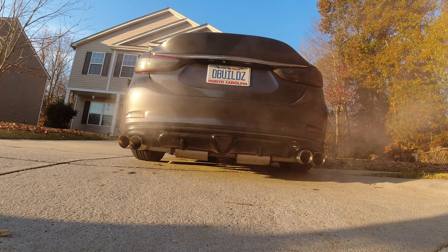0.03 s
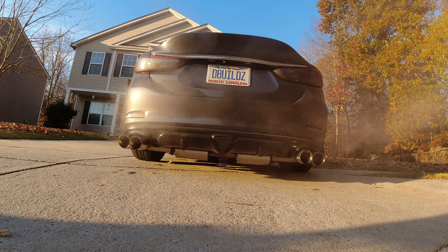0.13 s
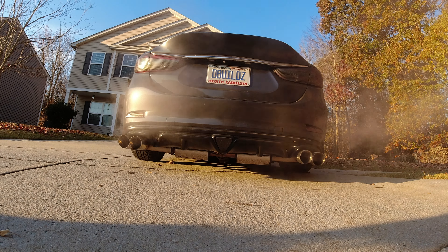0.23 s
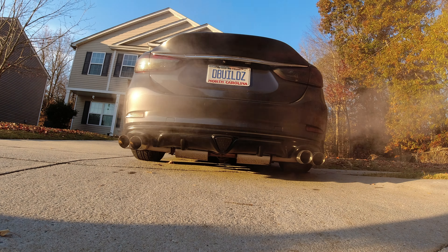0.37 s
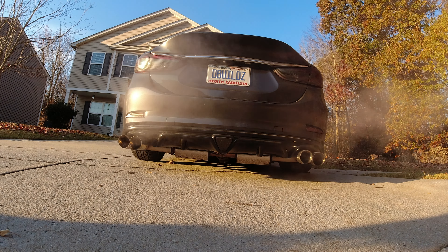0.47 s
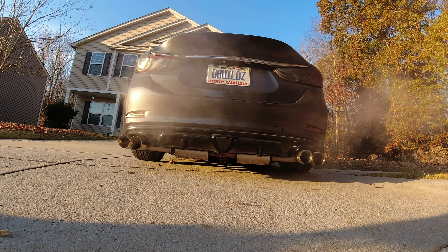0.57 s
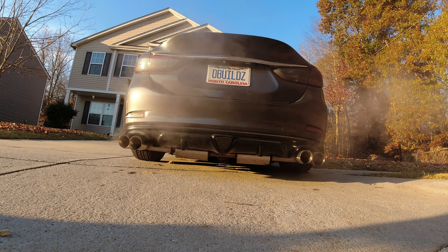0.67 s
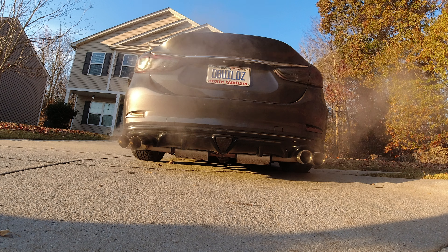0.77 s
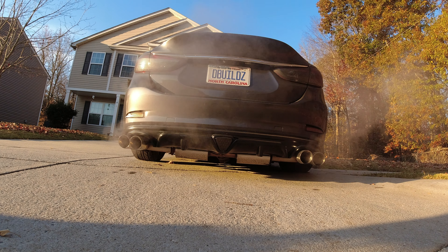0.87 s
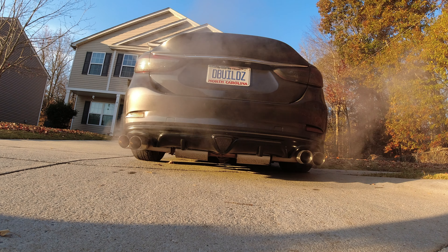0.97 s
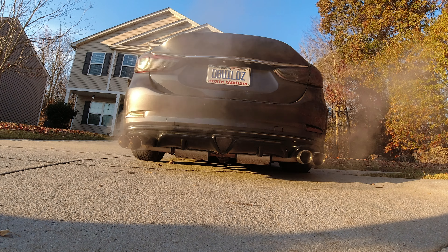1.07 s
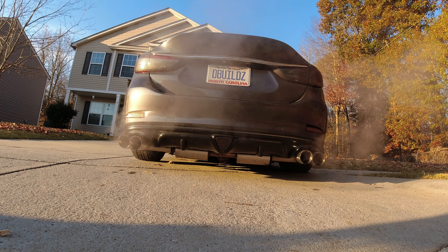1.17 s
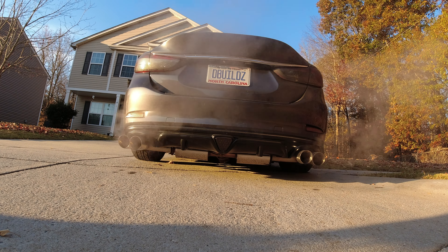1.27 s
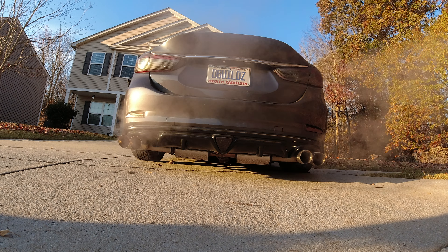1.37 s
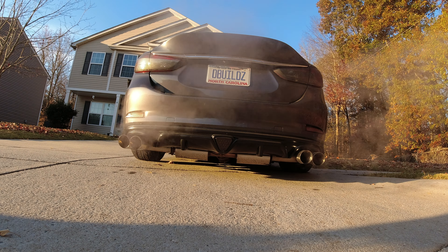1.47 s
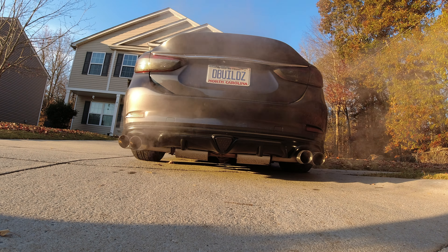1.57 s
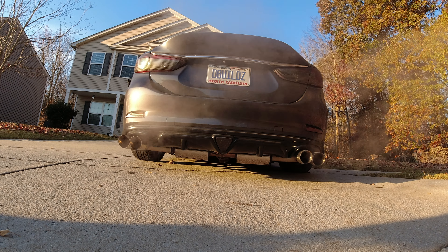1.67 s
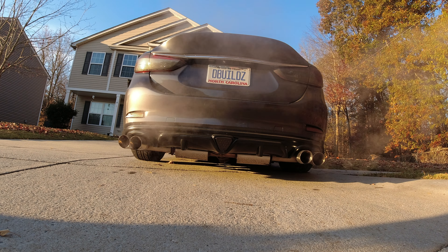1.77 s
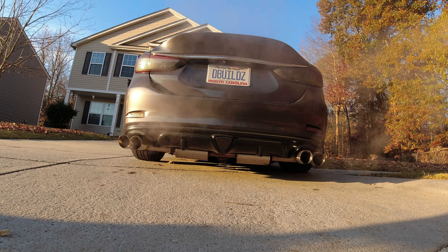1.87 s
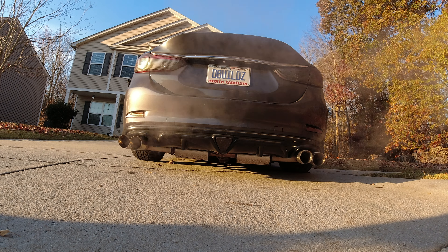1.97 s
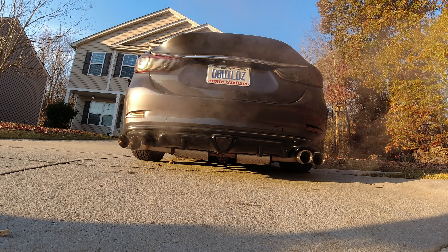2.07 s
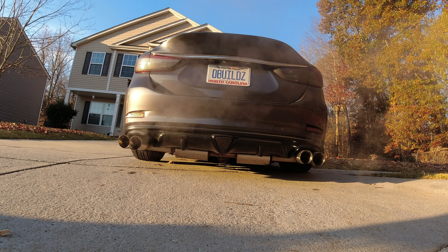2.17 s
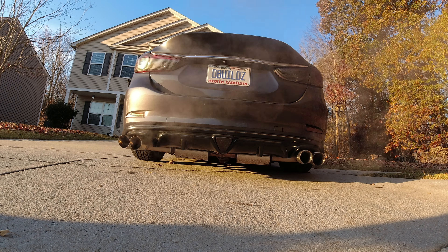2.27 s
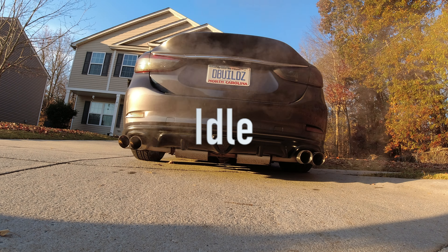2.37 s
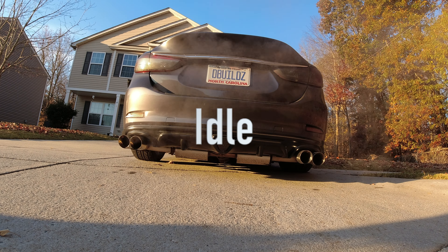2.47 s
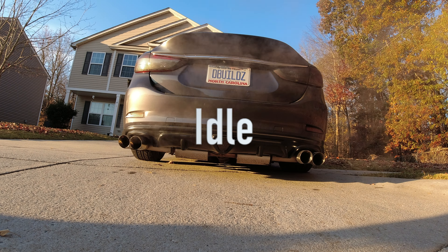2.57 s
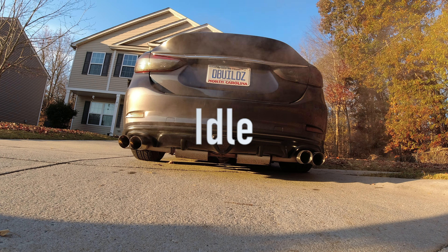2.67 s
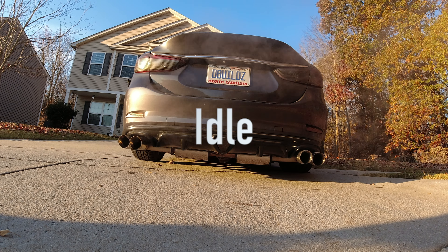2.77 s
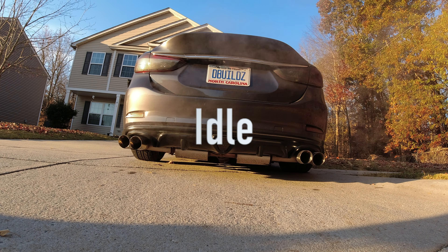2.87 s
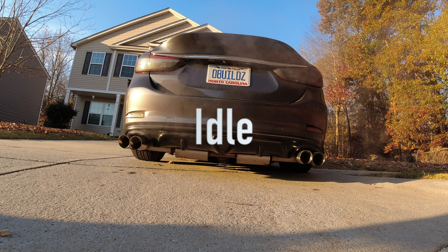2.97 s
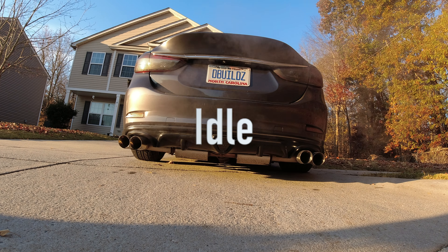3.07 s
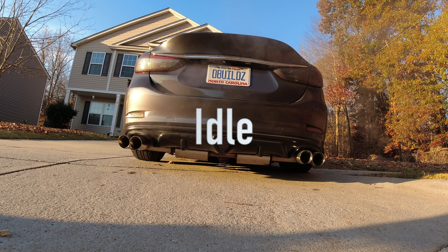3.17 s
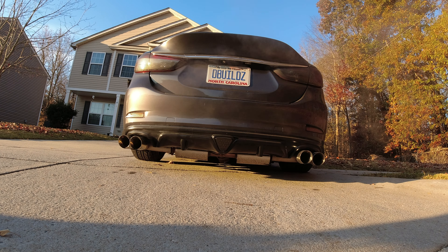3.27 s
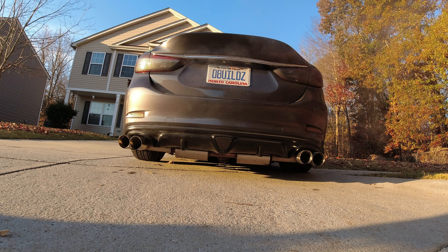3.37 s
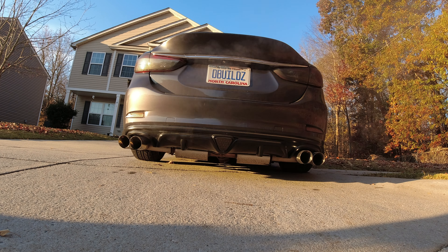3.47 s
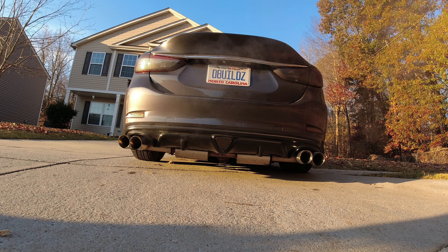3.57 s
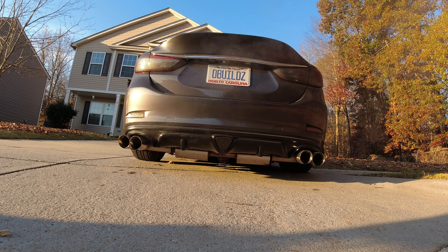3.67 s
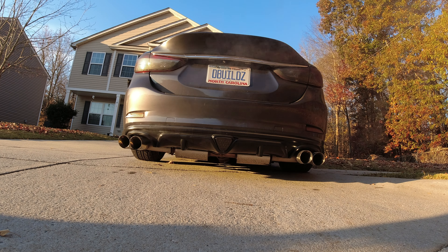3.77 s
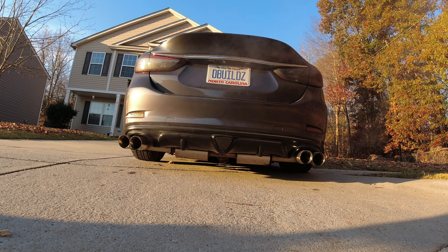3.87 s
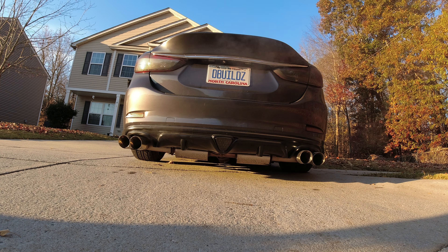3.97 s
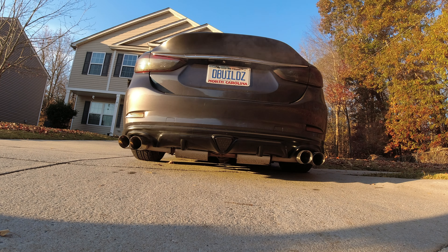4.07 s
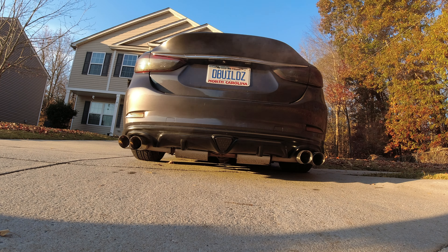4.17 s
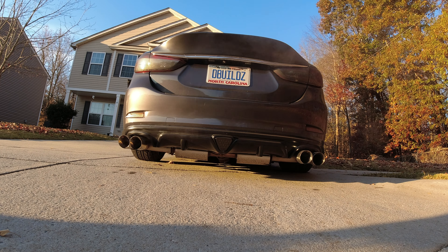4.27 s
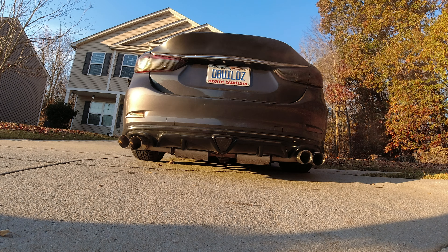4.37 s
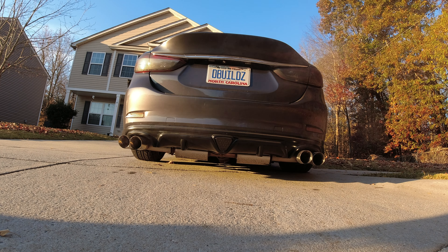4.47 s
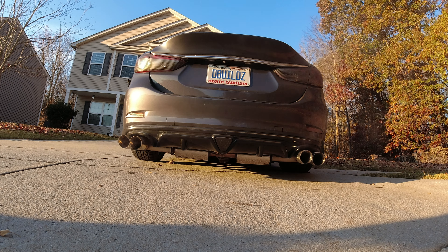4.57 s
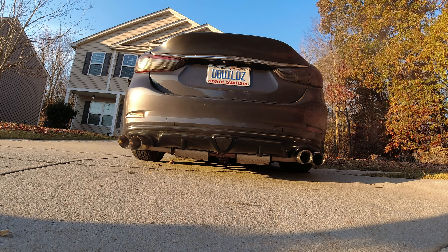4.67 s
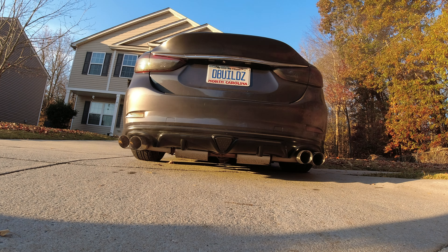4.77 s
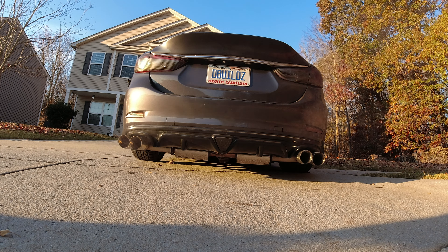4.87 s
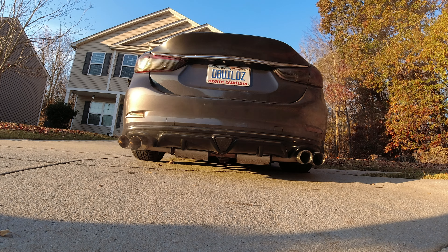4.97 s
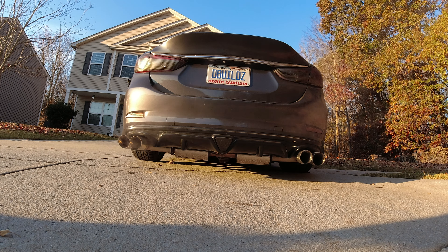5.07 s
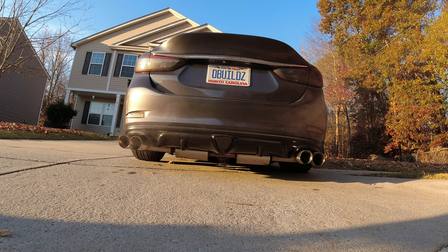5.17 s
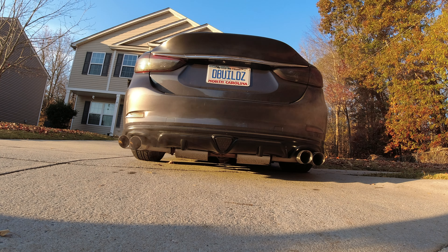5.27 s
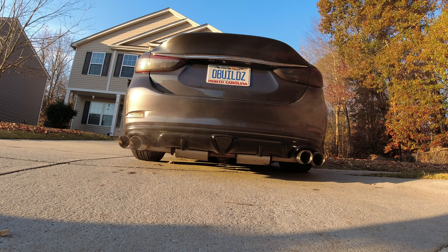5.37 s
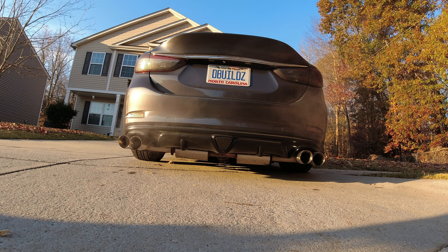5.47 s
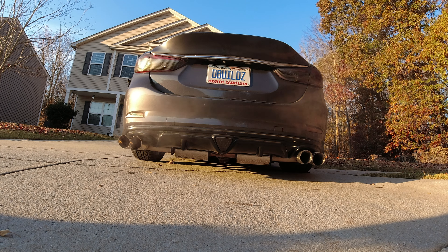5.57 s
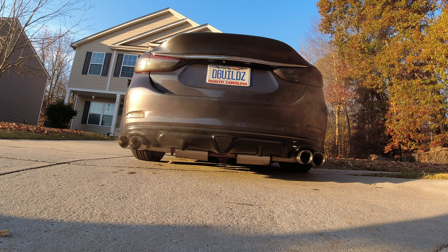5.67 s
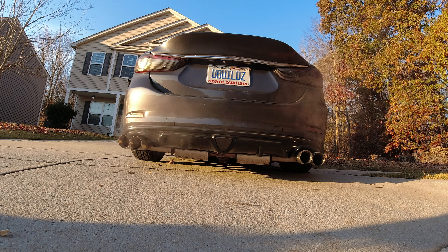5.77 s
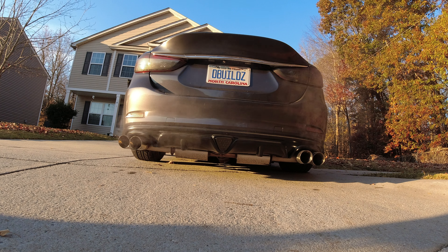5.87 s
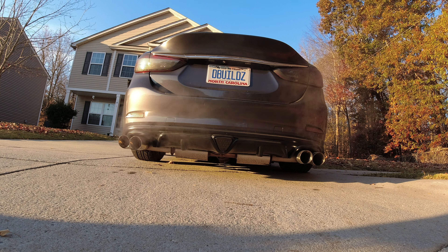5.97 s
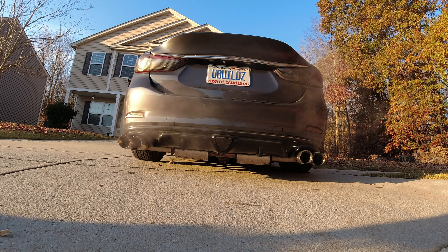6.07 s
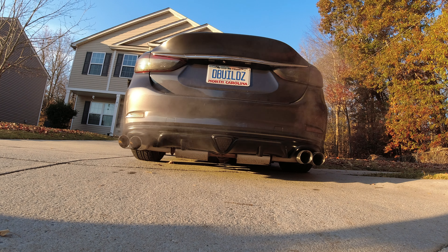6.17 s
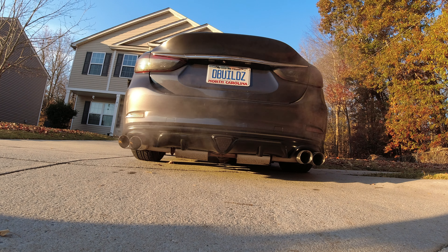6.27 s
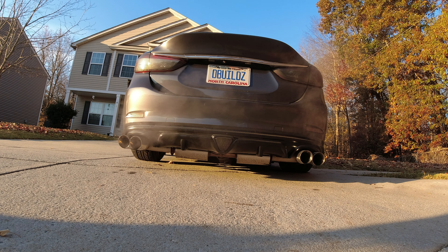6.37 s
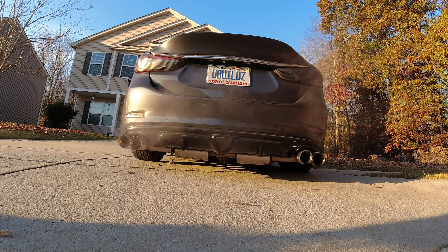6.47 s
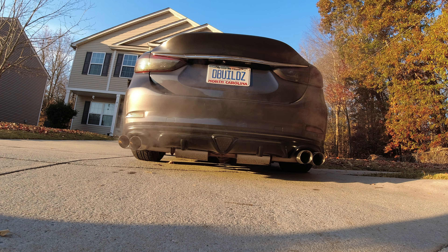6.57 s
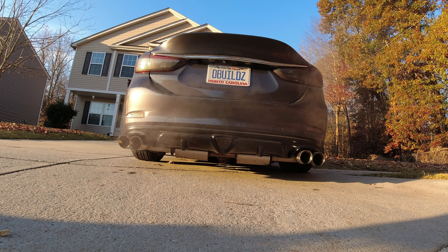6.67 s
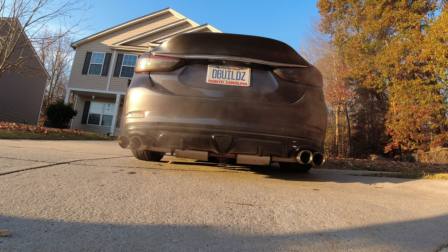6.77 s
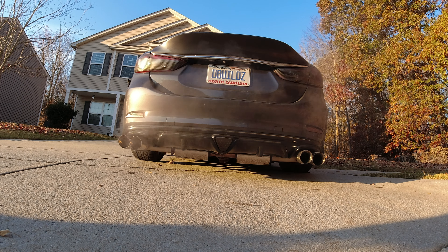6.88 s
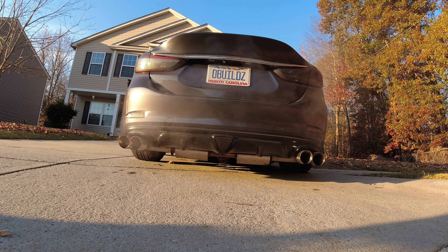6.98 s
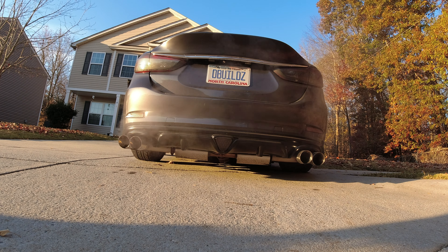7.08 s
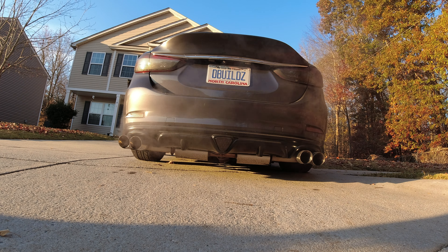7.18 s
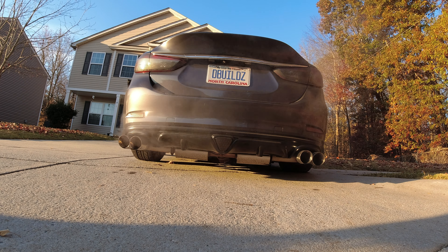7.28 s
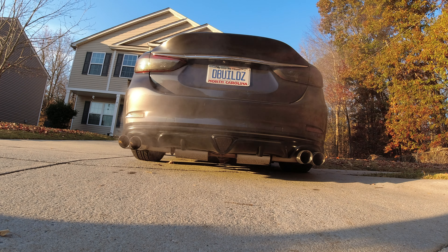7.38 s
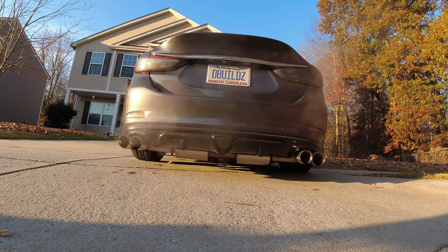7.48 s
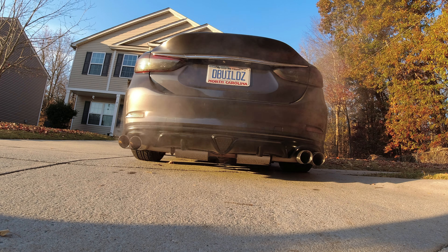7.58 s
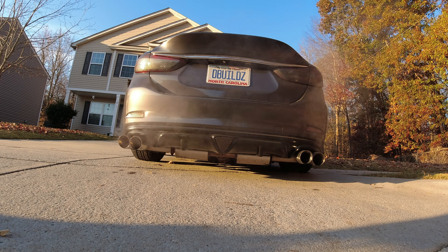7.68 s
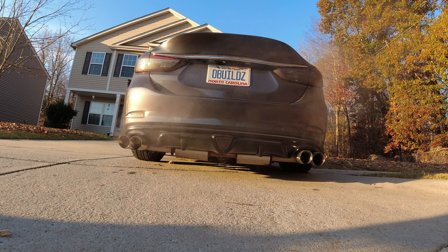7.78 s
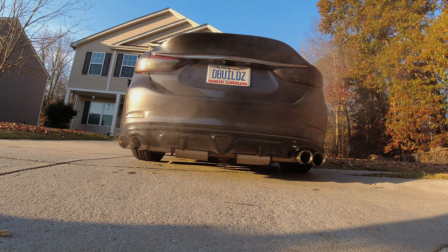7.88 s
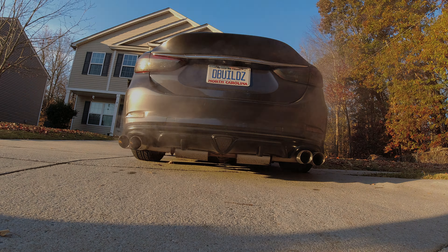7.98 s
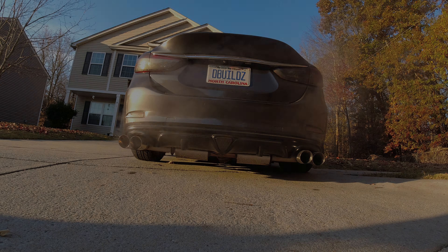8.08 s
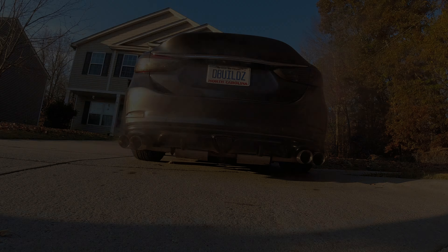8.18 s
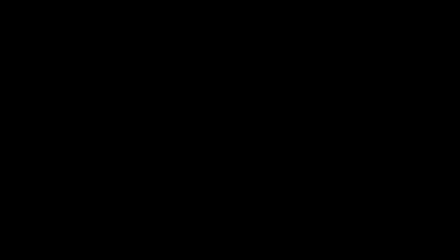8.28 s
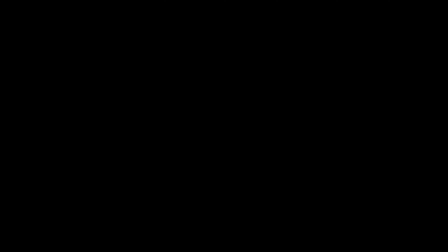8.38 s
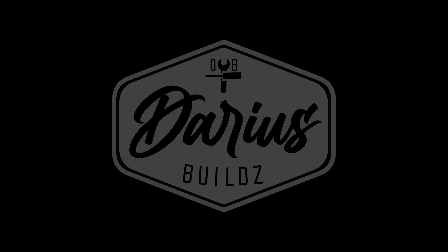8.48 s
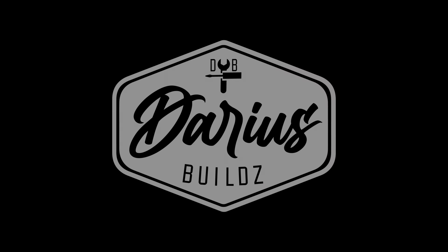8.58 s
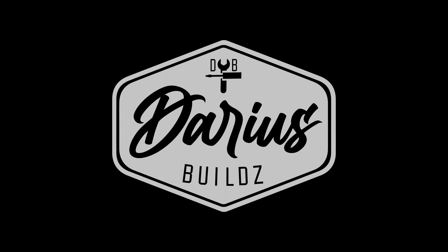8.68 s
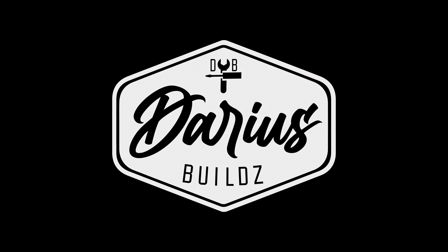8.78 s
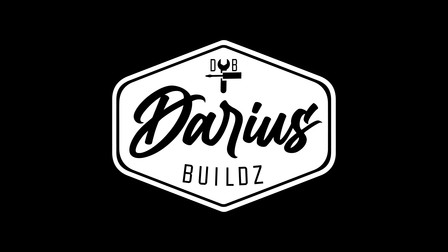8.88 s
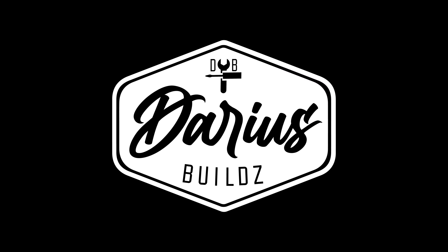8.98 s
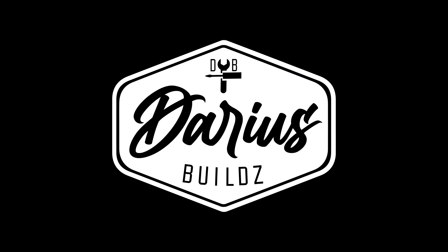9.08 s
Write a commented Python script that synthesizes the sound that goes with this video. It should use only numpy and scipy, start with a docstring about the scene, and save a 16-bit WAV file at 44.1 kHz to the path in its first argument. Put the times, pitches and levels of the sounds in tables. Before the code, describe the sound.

Outdoors behind a cold four-cylinder car, a booming rev drops away through crackly burble into a soft, uneven idle, small birds chipping before a fade-out.

```python
"""A cold four-cylinder car with a sports exhaust falls back from a rev, burbling and spitting, and catches
at a lumpy idle whose boom later drops away. Exhaust: sliding firing orders, puffs and firing-gated noise.
Gas and fan rush, a pulley hums, valves tick, a tappet knocks and a faint whine lasts until the idle catches:
filtered noise and sines. Small birds chip, as sine sweeps scattered by the trees. The sound fades out."""
import sys
import numpy as np
from scipy import signal
from scipy.fft import rfft, irfft, next_fast_len
from scipy.io import wavfile
from scipy.ndimage import map_coordinates

SR = 44100
rng = np.random.default_rng(int(sys.argv[2]) if len(sys.argv) > 2 else 0)


def wrap_up_sound(samples):
    """Save the sound to the file named by the first command line argument, as 16-bit audio."""
    columns = np.atleast_2d(samples).T
    # keep every value between -1 and 1, then stretch to whole-number steps
    tamed = np.clip(columns, -1, 1)
    steps = np.round(tamed * 32767).astype(np.int16)
    wavfile.write(sys.argv[1], SR, steps)


N = 402625

# Relative strength of each cylinder's puff.
CYLINDER_STRENGTHS = [0.7, 1.1, 0.78, 0.95]
# Exhaust shell resonances. Each row: centre in Hz, width in Hz, relative level in dB.
SHELL_MODES = [(764, 14, 0.5), (1852, 15, 1), (2270, 130, -1.5), (2430, 29, -5.5), (2856, 24, -1),
               (3210, 140, -7.5), (3527, 67, -12.5)]
# Valve tick spectrum. Each row: frequency in Hz, relative level in dB.
TICK_SPECTRUM = [(1500, -15.5), (2400, -4.5), (2800, -7), (3400, -4), (3900, -17), (5500, -16.5),
                 (7000, -29.5), (12000, -32.5), (14000, -56.5)]
# Valve gear resonances. Each row: centre in Hz, width in Hz, relative level in dB.
VALVE_GEAR_MODES = [(2300, 250, -8.5), (3360, 320, 1)]

CATCH_S, CATCH_TAKES_S = 1.6, .2  # the idle catches
SETTLE_S, SETTLE_TAKES_S = 4.48, 0.056  # the cold-start boom drops away


def amp(db):
    """Decibels to gain."""
    return 10 ** (np.asarray(db) / 20)


def unit(x):
    """Scaled to rms 1."""
    return x / np.sqrt(np.mean(x ** 2) + 1e-20)


def along(points, hz):
    """(Hz, value) points interpolated on a log frequency axis."""
    f, v = np.transpose(points)
    return np.interp(np.log(hz + 1), np.log(f + 1), v)


def curves(rows):
    """One value per sample for each column after the time in seconds."""
    s, *cols = np.transpose(rows)
    return [np.interp(np.arange(N) / SR, s, c) for c in cols]


def wobble(rate):
    """Smooth random curve, rate knots a second."""
    knots = rng.standard_normal(int(N * rate / SR) + 4)
    return map_coordinates(knots, [np.arange(N) * rate / SR])


def ramp(start, length):
    """Rises from 0 to 1 over length seconds, beginning at start seconds."""
    return np.clip((np.arange(N) / SR - start) / max(length, 1 / SR), 0, 1)


def swell(start, attack, hold, release):
    """Attack, hold and release envelope; all times in seconds."""
    return ramp(start, attack) - ramp(start + attack + hold, release)


def filtered(x, response):
    """x through a complex response of frequency."""
    m = 2 * next_fast_len((N + SR) // 2)
    return irfft(rfft(x, m) * response(np.fft.rfftfreq(m, 1 / SR)), m)[:N]


def causal_log_response(points, hz):
    """Complex log of a causal filter shaped by (Hz, dB) points, from its folded cepstrum."""
    cepstrum = irfft(np.log(amp(along(points, hz))))
    cepstrum[len(hz):] = 0
    return 2 * rfft(cepstrum)


def coloured(x, points):
    """x through a causal filter shaped by (Hz, dB) points, at rms 1."""
    return unit(filtered(x, lambda hz: np.exp(causal_log_response(points, hz))))


def phase_of(points, hz):
    """Phase in radians, at hz, of the causal filter shaped by the points."""
    grid = np.fft.rfftfreq(SR, 1 / SR)
    return np.interp(hz, grid, causal_log_response(points, grid).imag)


def ringing(x, modes):
    """x through a bank of (Hz, width Hz, dB) resonances, at rms 1."""
    def response(f):
        return sum(amp(db) * 1j * f * w / (c * c - f * f + 1j * f * w) for c, w, db in modes)
    return unit(filtered(x, response))


def gated(turns, depth_db):
    """Noise that swells once in each turn, depth_db above and below its mean level."""
    return rng.standard_normal(N) * amp(depth_db * np.cos(2 * np.pi * turns))


def boom(firings, rate, effort_db, lag_hz=43, waver_db=1.28, rumble_db=-23, round_hz=51, sharp_hz=33):
    """The four lowest orders slide through the silencer's resonances over a turbulent rumble."""
    # What the silencer passes. Each row: frequency in Hz, relative level in dB.
    silencer = [(28, -16), (45, -5), (58, 0.5), (68, -6.5), (78, -8.5), (90, -13), (104, -4.5), (135, -10),
                (165, -13), (190, -4), (215, -17.5), (248, -7.5), (280, 3.5), (310, -2.5), (350, 1.5),
                (410, -8)]
    # Change of orders 1 to 4 in dB as the boom drops away.
    settle_dbs = [2.5, -9.5, -3, -1]
    # Change of orders 1 to 4 in dB during the stumble.
    stumble_dbs = [-6.5, 7, 10, -8]
    stumble_s, stumble_width_s = 0.78, 0.031
    coast_tilt_db, idle_tilt_db = -10, -2  # per octave of order: round pulses coasting, sharp at idle

    tilt_db = np.interp(rate, [sharp_hz, round_hz], [idle_tilt_db, coast_tilt_db])
    settled = ramp(SETTLE_S, SETTLE_TAKES_S)
    stumble = np.exp(-((np.arange(N) / SR - stumble_s) / stumble_width_s) ** 2)
    skew = (lag_hz / rate) ** 1.86  # slow pulses split into a push and a suck
    lines, order_dbs = 0, []
    for k, (settle_db, stumble_db) in enumerate(zip(settle_dbs, stumble_dbs), 1):
        db = effort_db + along(silencer, k * rate) + tilt_db * np.log2(k)
        db = db + settled * settle_db + stumble * stumble_db
        phase = 2 * np.pi * k * firings - skew + phase_of(silencer, k * rate)
        lines = lines - amp(db + waver_db * wobble(25)) * np.cos(phase)
        order_dbs.append(db)
    rumble = coloured(gated(firings, depth_db=0.5), [
        (15, -5), (40, -6.0), (90, -1), (180, 1.5), (330, -11.0), (600, -34.5), (1500, -72.5)])
    rumble_gain = (amp(order_dbs[0]) + amp(order_dbs[1])) * amp(rumble_db)
    return np.sqrt(2) * lines + rumble_gain * rumble


def bark(firings, rate, step_db=-5.0, burble_db=-4, uneven_db=-12, coast_db=-59, idle_db=-63,
         quiet_rough=.15, ring_db=3.5):
    """Higher orders slide through the pipe's resonances; uneven burning burbles and rings the pipe."""
    # Pipe resonances. Each row: frequency in Hz, relative level in dB.
    pipe_spectrum = [(150, -25.5), (215, -24), (250, -12), (280, 2), (345, 4), (400, -9), (460, -3),
                     (510, -16), (580, -4), (660, -15.5), (900, -27), (1500, -18)]
    # Bark at high revs, then in the burble. Each row: start, attack, hold and release in seconds,
    # relative level in dB, roughness 0-1.
    bark_rows = [(-.2, .45, 0.048, 0.19, -35, 0), (0.55, .13, 0.222, .02, -39.5, 0.4)]
    # Pipe ring during the burble. Each row: centre in Hz, width in Hz, relative level in dB.
    ring_modes = [(288, 22, -2), (330, 17, 1.5)]

    def order(k):
        return -amp(along(pipe_spectrum, k * rate)) * np.cos(2 * np.pi * k * firings)

    quiet = amp(coast_db + (idle_db - coast_db) * ramp(CATCH_S, CATCH_TAKES_S))
    barks = [amp(db) * swell(*shape) for *shape, db, _ in bark_rows]
    level = quiet + sum(barks)
    rough_level = quiet_rough * quiet + sum(row[-1] * one for row, one in zip(bark_rows, barks))
    rough = rough_level / level

    lines = sum(amp(step_db * i) * order(k) for i, k in enumerate(range(5, 13)))
    fast = np.interp(rate, [62, 78], [0, 1])  # at high revs unequal cylinders add half orders
    halves = sum(order(k + .5) * (1 + .5 * wobble(8)) for k in range(1, 6))
    tones = np.sqrt(2) * (lines + fast * amp(uneven_db) * halves) * (1 + rough * wobble(90))

    burble = coloured(gated(firings, depth_db=5.5), [
        (25, -16.5), (80, -11.5), (200, 0.0), (370, 4.5), (480, -16.5), (800, -35.5), (2000, -78.5)])
    ring_drive = coloured(gated(firings, depth_db=4.5), [
        (60, -19), (250, 3), (400, 1), (600, -26), (2000, -68)])
    ring = amp(ring_db) * barks[-1] * ringing(ring_drive, ring_modes)
    return level * (tones + 2 * rough * amp(burble_db) * burble) + ring


def puffs(firings, scatter_db=-0.2, jitter_s=0.00018, breath_db=-7, lead_turns=0.197,
          round_trip_s=.0196, reflection=0.55, coast_db=-54.5, catch_db=8.0, settle_db=1.3):
    """Each firing leaves as a puff, returns once along the pipe and stirs turbulence; louder at idle."""
    # Puff spectrum. Each row: frequency in Hz, relative level in dB.
    puff_spectrum = [(20, -39.5), (100, -23.5), (125, -3.5), (150, 9.5), (205, 2.5), (256, 0), (295, -12),
                     (400, -21.5), (700, -32.5), (2000, -73)]
    at = np.flatnonzero(np.diff(np.floor(firings + lead_turns)))
    chance = rng.standard_normal((len(at), 2))
    size = np.resize(CYLINDER_STRENGTHS, len(at)) * amp(scatter_db * chance[:, 0])
    jittered = np.clip(at + jitter_s * SR * chance[:, 1], 0, N - 1).astype(int)
    train = np.bincount(jittered, size, N)
    train = filtered(train, lambda hz: 1 + reflection * np.exp(-2j * np.pi * hz * round_trip_s))
    turbulence = coloured(gated(firings, depth_db=2.5), [
        (20, -7.5), (45, -3.5), (100, -1.0), (200, 9), (300, -3), (450, -22.5), (900, -55)])
    level_db = coast_db + catch_db * ramp(CATCH_S, CATCH_TAKES_S)
    level_db = level_db + settle_db * ramp(SETTLE_S, SETTLE_TAKES_S)
    return amp(level_db) * (coloured(train, puff_spectrum) + amp(breath_db) * turbulence)


def rasp(firings, effort_db, rasp_db=-49.5, shell_db=-52.0, spit_db=-2, tips_db=-8, sizzle_db=-69,
         flutter_db=1.5):
    """Gas rasps in the pipe with the pulse strength, sizzles at the tips and spits in short bursts."""
    # Pipe rasp. Each row: frequency in Hz, relative level in dB.
    rasp_spectrum = [(600, -10), (1000, 0.5), (1500, -0.5), (2300, 1.5), (2700, -1), (3500, -1.5),
                     (4000, -11.5), (5200, -6), (6500, -17), (12000, -30.5)]
    # Gas at the tips. Each row: frequency in Hz, relative level in dB.
    spit_spectrum = [(2000, -17), (3500, 15.5), (4300, 7.5), (6000, 2.5), (8200, 1), (9000, -4),
                     (13500, -14), (15000, -8.5)]
    # Tail pipe tip resonances. Each row: centre in Hz, width in Hz, relative level in dB.
    tip_modes = [(7010, 72, -1), (7190, 50, 1), (8130, 70, -6.5)]
    # Spits. Each row: start, attack, hold and release in seconds, relative level in dB.
    spit_rows = [(0.542, .15, 0.038, 0.049, -57.5), (0.798, .018, 0.061, .02, -61.5),
                 (0.912, .04, 0.017, 0.13, -67.5)]

    pipe = amp(rasp_db) * coloured(gated(firings, depth_db=3), rasp_spectrum)
    shell = amp(shell_db) * ringing(rng.standard_normal(N), SHELL_MODES)
    gas = amp(spit_db) * coloured(gated(firings, depth_db=-2.5), spit_spectrum)
    tip_ring = amp(tips_db) * ringing(gated(firings, depth_db=21.5), tip_modes)
    sizzle = amp(effort_db + sizzle_db)
    spits = sum(amp(db) * swell(*shape) for *shape, db in spit_rows)
    sound = amp(effort_db) * (pipe + shell) + (sizzle + spits) * (gas + tip_ring)
    return amp(flutter_db * wobble(70)) * sound


def rush(firings, level_db=4.5, shell_db=-14):
    """Gas and fan noise, pulsing slightly, with the steel shell singing along."""
    # Flow strength. Each row: time in seconds, relative level in dB.
    flow = [(0, -56.5), (1, -57), (2.6, -57), (5, -55), (8, -55.5)]
    # Flow spectrum. Each row: frequency in Hz, relative level in dB.
    rush_spectrum = [(180, -20), (300, 1), (450, -2), (1050, -5.5), (1300, -9.5), (1600, -16.5),
                     (2050, -21), (2300, -24), (2700, -26.5), (3500, -25.5), (4000, -39), (5500, -35.5),
                     (7000, -51.5), (11800, -51.5), (13000, -71.5)]
    air = amp(level_db) * coloured(gated(firings, depth_db=-0.9), rush_spectrum)
    shell = amp(shell_db) * ringing(rng.standard_normal(N), SHELL_MODES)
    return amp(curves(flow)[0] + .3 * wobble(15)) * (air + shell)


def hum(firings, ratio=5.48, level_db=-52):
    """A belt-driven pulley hums between the firing orders and beats with them."""
    return np.sqrt(2) * amp(level_db + .5 * wobble(0.96)) * np.sin(2 * np.pi * ratio * firings)


def valves(firings, tick_db=-73, tappet_db=-80, settle_db=3, tappet_scatter_db=0.2, tick_time_s=2.146):
    """Light valve ticks, two per firing, and one louder tappet once in each engine cycle."""
    ticks = coloured(gated(2 * firings, depth_db=4.5) * amp(1.5 * wobble(60)), TICK_SPECTRUM)
    firings_at_tick = np.interp(tick_time_s * SR, np.arange(N), firings)
    cycle = (firings - firings_at_tick) / len(CYLINDER_STRENGTHS)
    strike = np.exp(10 * (np.cos(2 * np.pi * cycle) - 1))
    blows = coloured(strike * rng.standard_normal(N) * amp(tappet_scatter_db * wobble(7)), [
        (1200, -13.5), (2200, 7.5), (3700, 3.0), (4500, -13.5)])
    tappet_gain = amp(tappet_db + settle_db * ramp(SETTLE_S, SETTLE_TAKES_S))
    return amp(tick_db) * ticks + tappet_gain * ringing(blows, VALVE_GEAR_MODES)


def whine(hz=797, width_hz=8, level_db=-66):
    """Faint whine, noise through a narrow resonance, until the idle catches."""
    tone = ringing(rng.standard_normal(N), [(hz, width_hz, 0)])
    return amp(level_db) * (1 - ramp(CATCH_S, CATCH_TAKES_S)) * tone


def knocks(level_db=-5, t60_s=0.054):
    """Now and then the tappet strikes hard: decaying noise through the valve gear's resonances."""
    # Hardest knocks. Each row: time in seconds, relative level in dB.
    knock_rows = [(1.9997, -60), (2.1456, -55), (2.4139, -59), (2.5531, -55), (3.1206, -59), (3.2594, -56),
                  (5.6296, -56), (5.7683, -59)]
    t = np.arange(N) / SR
    strikes = sum(amp(db) * (t >= s) * np.exp(-np.log(1000) * abs(t - s) / t60_s) for s, db in knock_rows)
    ring = ringing(coloured(rng.standard_normal(N), TICK_SPECTRUM), VALVE_GEAR_MODES)
    return amp(level_db) * strikes * ring


def birds(echo_t60_s=.35):
    """Thin upward chips that level off; far ones arrive mostly scattered by the trees."""
    # Chips. Each row: start in seconds, length in seconds, start Hz, end Hz, level in dB,
    # direct share 0-1.
    chip_rows = [(3.993, 0.036, 5200, 5444, -73, .3), (4.188, 0.037, 5700, 8370, -60, 0.92),
                 (4.196, 0.029, 5820, 8680, -56, 0.96), (4.58, .03, 5200, 5400, -73, .3),
                 (5.31, .03, 5300, 5900, -71, .3), (5.54, 0.049, 5100, 5330, -73, .3),
                 (6.136, 0.03, 5130, 5450, -67, 0.3), (6.313, .015, 5440, 6200, -70, .4),
                 (7.192, 0.019, 5040, 5900, -62.5, 0.7), (8.12, .028, 5070, 5400, -69, .3)]
    song = np.zeros(N + SR)
    t = np.arange(SR // 2) / SR
    for s, length_s, start_hz, end_hz, db, direct in chip_rows:
        u = np.linspace(0, 1, int(length_s * SR))
        hz = end_hz + (start_hz - end_hz) * (1 - u) ** 2
        envelope = amp(db) * np.sqrt(abs(np.sin(np.pi * u)))
        chip = envelope * np.sin(2 * np.pi * np.cumsum(hz) / SR)
        path = rng.standard_normal(len(t)) * np.exp(-np.log(1000) * t / echo_t60_s)
        path *= np.sqrt(max(1 - direct ** 2, 0)) / np.linalg.norm(path)
        path[0] = direct
        heard = signal.fftconvolve(chip, path)
        song[int(s * SR):][:len(heard)] += heard
    return song[:N]


def scene():
    """One crankshaft drives the engine layers; knocks, whine and birds are timed on their own."""
    # Engine coasting down, then hunting a little. Each row: time in seconds, firings per second.
    speed = [(0, 103.2), (0.11, 96), (0.41, 75.6), (0.58, 65.5), (0.71, 59.4), (0.95, 53), (1.07, 48.2),
             (1.4, 37.7), (1.6, 32.9), (1.8, 29.9), (1.95, 29.1), (3.1, 28.55), (4, 28.7), (5, 28.55),
             (5.6, 28.8), (6.5, 27.86), (7, 28.15), (8, 28.2)]
    # Exhaust pulse strength. Each row: time in seconds, relative level in dB.
    effort = [(0, -1.5), (.35, -7.5), (.72, -12), (.95, -17.5), (1.1, -21.5), (1.5, -33), (2.6, -31),
              (6.5, -37)]
    rate, effort_db = curves(speed)[0], curves(effort)[0]
    firings = np.cumsum(rate) / SR
    exhaust = boom(firings, rate, effort_db) + bark(firings, rate) + puffs(firings) + rasp(firings, effort_db)
    engine = exhaust + rush(firings) + hum(firings) + valves(firings) + whine() + knocks()
    return (engine + birds())[None]


def record(dry, attack_s=.002, top_hz=15000):
    """A soft start, a fade to silence, and the band limit."""
    # Each row: time in seconds, gain.
    fade = [(8.0, 1), (8.4, .48), (8.68, .09), (8.82, 0)]
    start = np.minimum(np.arange(N) / SR / attack_s, 1)
    return filtered(dry[0] * start * curves(fade)[0], lambda hz: hz < top_hz)[None]


dry = scene()
out = record(dry)
wrap_up_sound(out)
```